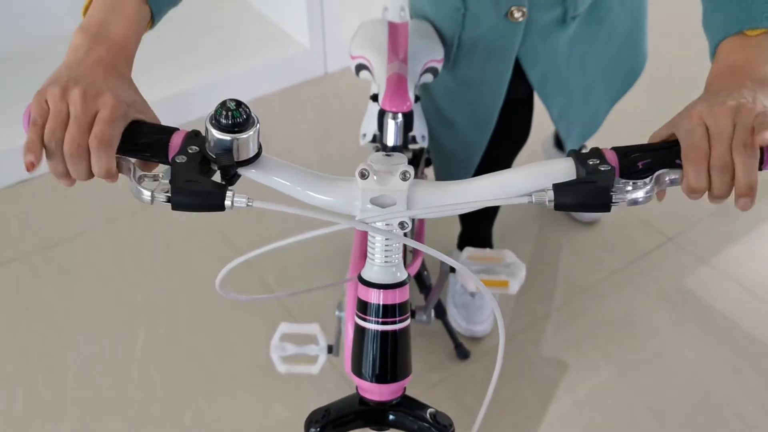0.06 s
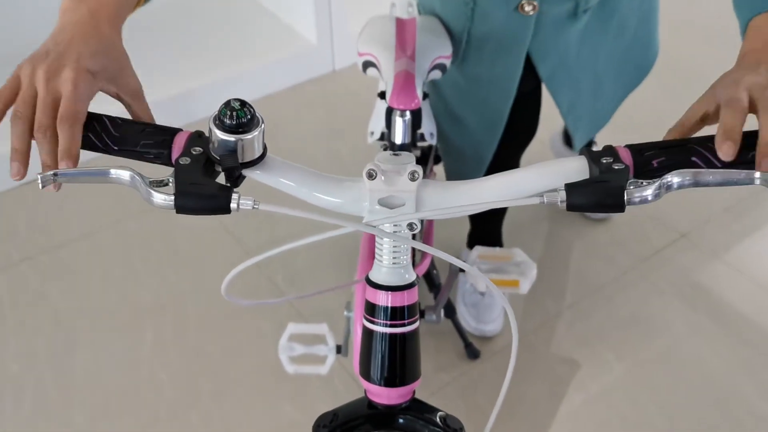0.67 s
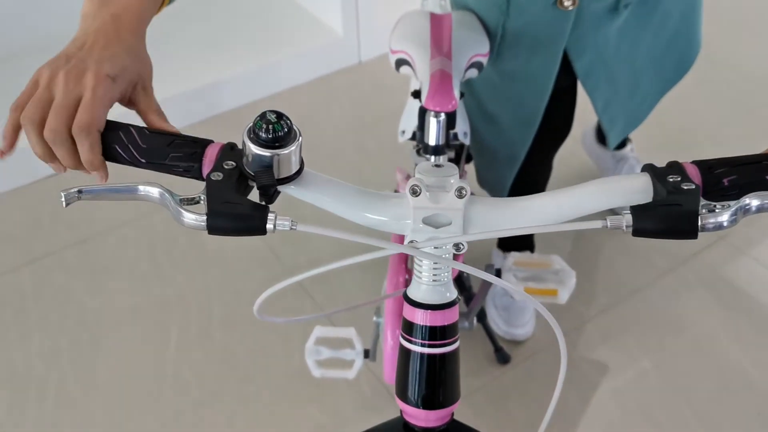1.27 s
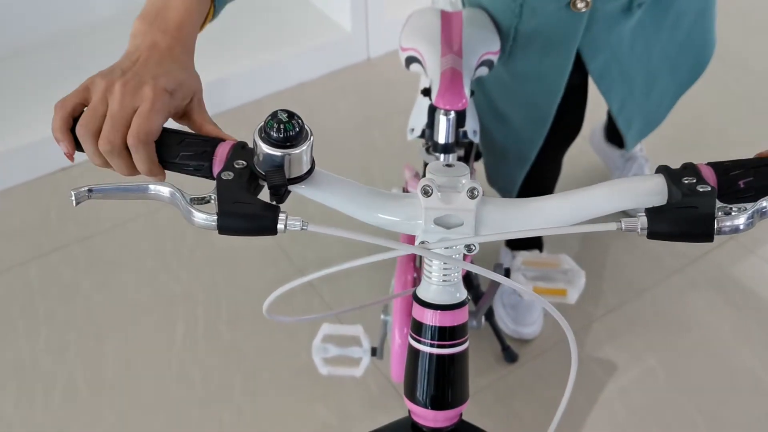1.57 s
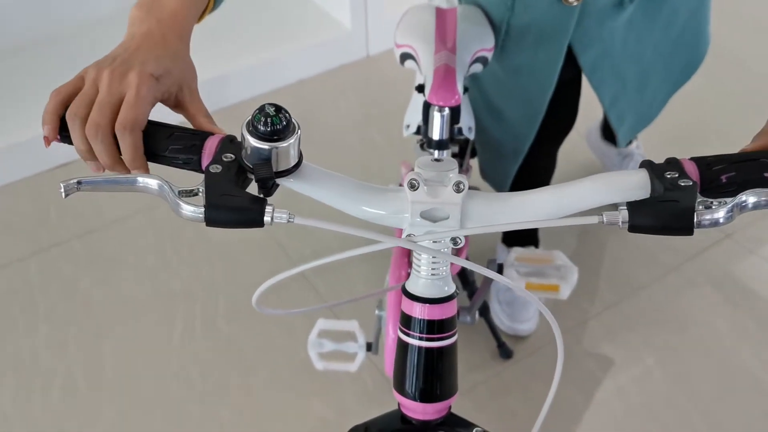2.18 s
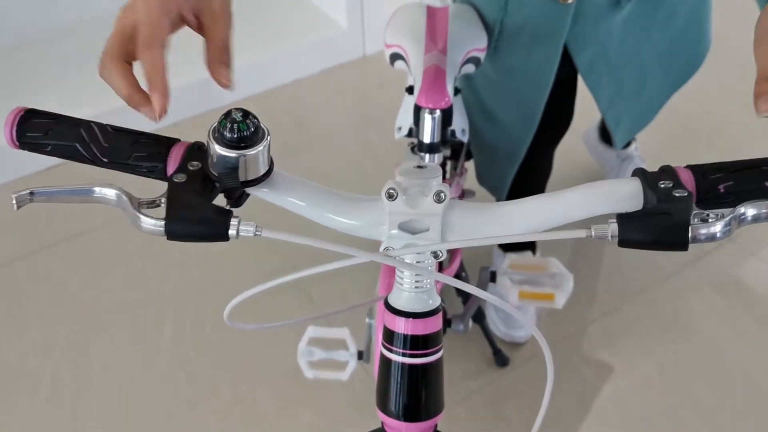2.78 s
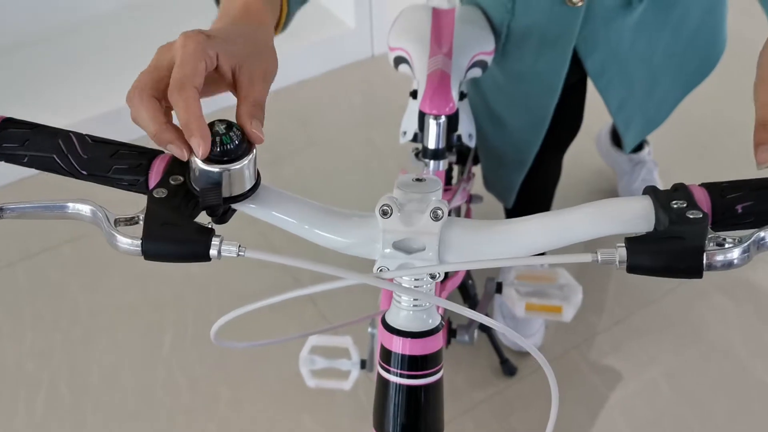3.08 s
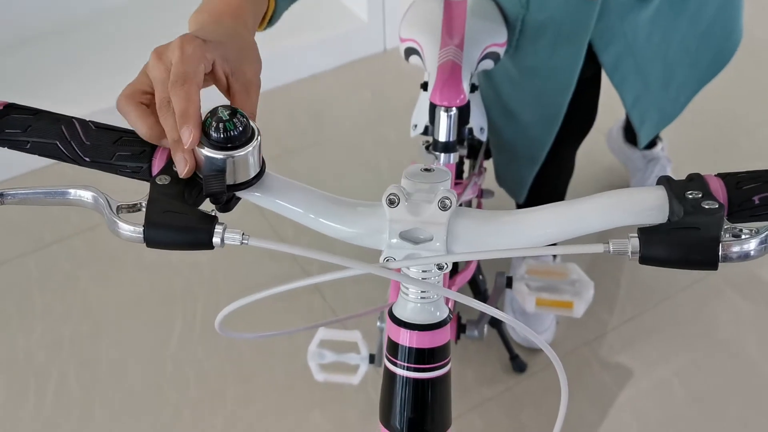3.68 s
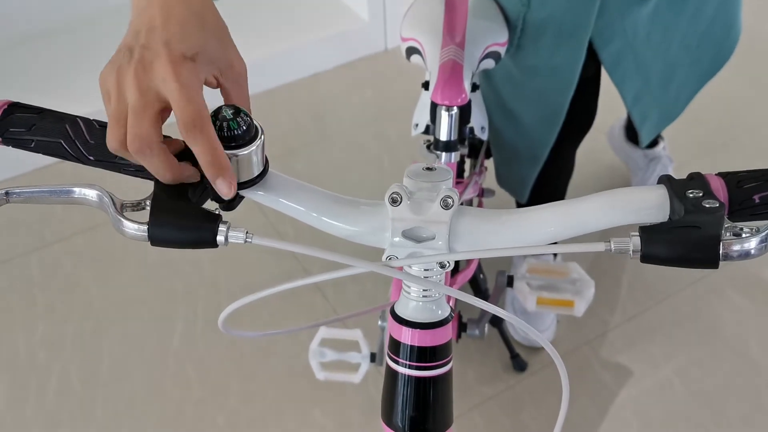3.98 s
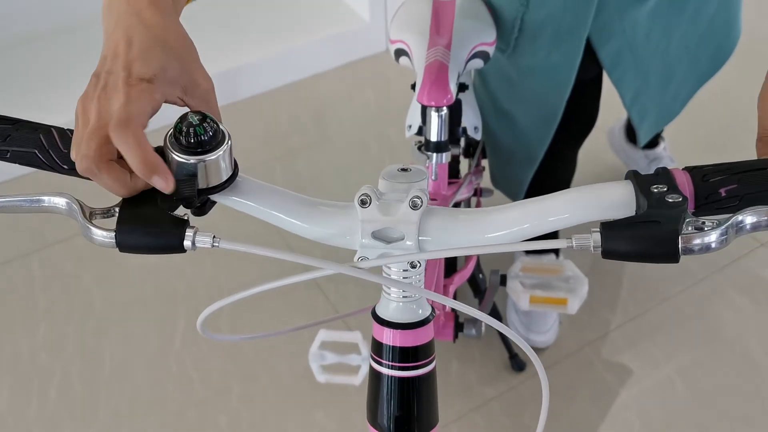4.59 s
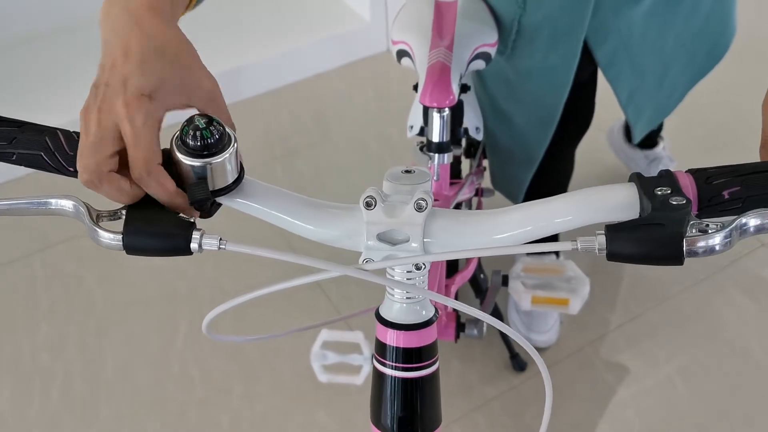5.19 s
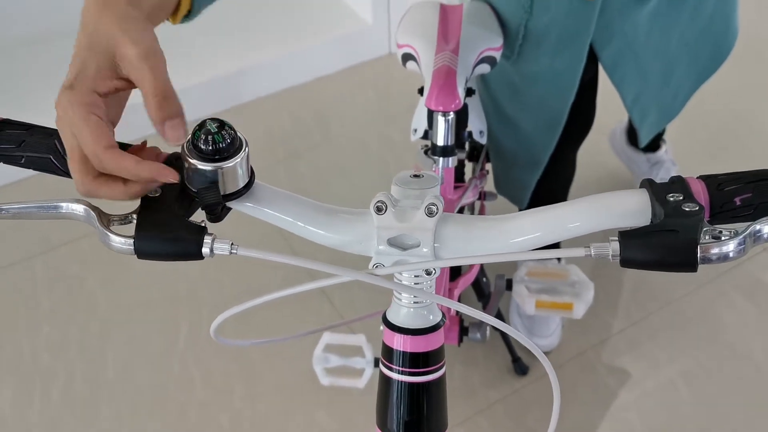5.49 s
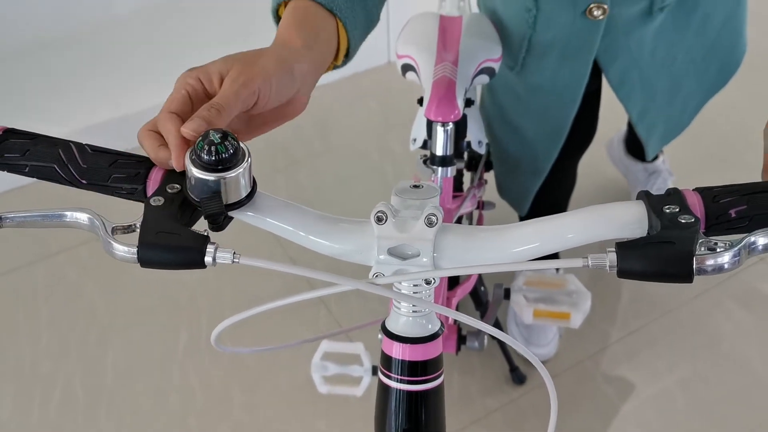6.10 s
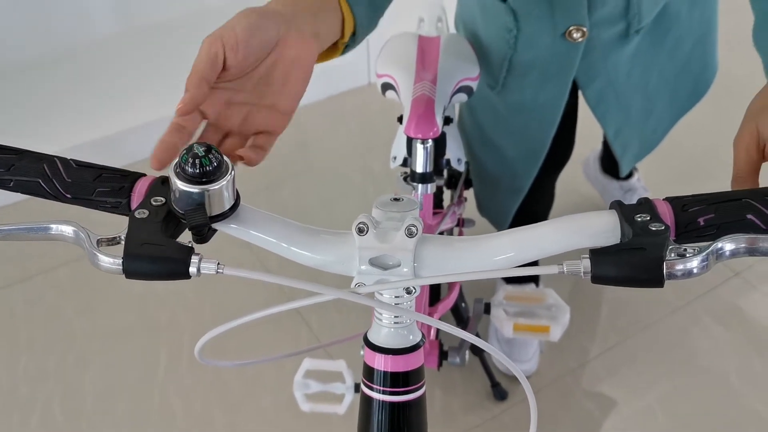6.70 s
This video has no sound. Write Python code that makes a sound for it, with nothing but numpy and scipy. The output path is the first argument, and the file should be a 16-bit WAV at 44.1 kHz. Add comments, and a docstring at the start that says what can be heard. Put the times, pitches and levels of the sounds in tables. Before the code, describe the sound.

In a bare, echoing room, bicycle brake levers tick as they are squeezed, a cable slides, and the levers snap back with two sharp metallic cracks. After a pause, a finger rubs, bumps and creaks close against the microphone on the right. Then a bicycle bell's plastic trigger scrapes and clicks softly, the dome muted by a hand. A few more close creaks follow over faint room hiss.

```python
"""Bicycle brakes and a muted bell

In a bare, echoing room, a bicycle's brake levers are squeezed and snap back, ringing the
handlebar. Then fingers fiddle with the bell: its plastic trigger clicks while the hand mutes
the dome. A finger on the camera bumps, rubs and creaks beside the right microphone."""
import sys
import numpy as np
from scipy import signal
from scipy.io import wavfile
from scipy.ndimage import uniform_filter1d

SR = 44100
rng = np.random.default_rng(int(sys.argv[2]) if len(sys.argv) > 2 else 0)


def materialize(psi):
    """Save the field psi as 16-bit PCM at rate SR to the path in sys.argv[1].

    A 1-D psi becomes a single channel; in a 2-D psi each row is a channel.
    """
    bounded = np.clip(np.atleast_2d(psi).T, -1, 1)
    quanta = np.round(bounded * 32767).astype(np.int16)
    wavfile.write(sys.argv[1], SR, quanta)


N = 301511
TIME = np.arange(N) / SR


def amp(db):
    """Turns decibels into a gain."""
    return 10 ** (np.asarray(db) / 20)


def unit(x):
    """Scales a sound to an average (rms) level of 1."""
    return x / np.sqrt(np.mean(x ** 2) + 1e-20)


def look_up(points, hz):
    """Reads between a table's rows on a log-frequency axis."""
    row_hz, values = np.transpose(points)
    return np.interp(np.log(hz + 1), np.log(row_hz + 1), values)


def add(mix, start, sound):
    """Mixes a sound in at a time in seconds."""
    part = mix[max(round(start * SR), 0):][:len(sound)]
    part += sound[:len(part)]


def colour(x, tone, size=4096):
    """Filters a sound to follow a tone table, with no ringing ahead of it."""
    hz = abs(np.fft.fftfreq(size, 1 / SR))
    log_gain = np.log(amp(look_up(tone, hz)))
    response = np.exp(np.conj(signal.hilbert(log_gain)))
    return signal.oaconvolve(x, np.fft.ifft(response).real)[:len(x)]


def burst(tone, decay_s, size=4096):
    """A brief contact makes a puff of noise that dies quickly."""
    fade = np.exp(-np.arange(size) / SR / decay_s)
    puff = colour(rng.standard_normal(size) * fade, tone)
    return .5 * puff * np.linalg.norm(fade) / np.linalg.norm(puff)


def ring(modes, spread=.015, size=12000):
    """A struck part rings at its own pitches (modes); the hand's grip detunes each blow a little."""
    t = np.arange(size) / SR
    detune = 1 + spread * rng.uniform(-1, 1)
    # neighbouring modes swing in opposite directions
    return sum((-1) ** k * amp(db - 60 * t / ring_s) * np.sin(2 * np.pi * hz * detune * t)
               for k, (hz, db, ring_s) in enumerate(modes))


def effort(strokes, release_s):
    """Each stroke gathers speed, holds, then dies away."""
    gain = np.zeros(N)
    for start, rise_s, hold_s, db in strokes:
        rise = np.clip((TIME - start) / rise_s, 0, 1) ** 2
        fall = np.exp(-np.maximum(TIME - start - rise_s - hold_s, 0) / release_s)
        gain = np.maximum(gain, amp(db) * rise * fall)
    return gain


def friction(strokes, tone, grain_db, release_s):
    """Rubbing is countless tiny, uneven slips; more grain makes it grittier."""
    clumps = unit(uniform_filter1d(rng.standard_normal(N), size=40))
    slips = rng.standard_normal(N) * amp(grain_db * clumps)
    return unit(colour(slips, tone)) * effort(strokes, release_s)


# The quiet room's tone. Each row, as in every tone table: frequency in Hz, level in dB.
AIR_TONE = [(15, -34), (25, 1), (87, -9), (108, -13.5), (134, -12.5), (242, -11), (270, -15.5), (309, -16),
            (427, -23.5), (962, -29.5), (1040, -31.5), (1940, -32.5), (2910, -35.5), (4870, -39.5),
            (8400, -50.5), (11500, -48), (16000, -52)]
def air(shared=0.096):
    """Steady room rumble and hiss, partly common to both microphones."""
    left, right, common = (unit(colour(rng.standard_normal(N), AIR_TONE)) for _ in range(3))
    pair = np.sqrt(1 - shared) * np.array([left, right]) + np.sqrt(shared) * common
    return amp([[-65.2], [-63.7]]) * pair


# How long the room rings. Each row: frequency in Hz, seconds to fade by 60 dB.
ROOM_FADE = [(150, 1.3), (350, 1.8), (1000, 1.43), (3000, 1.46), (4500, 1.1), (8000, 0.54), (15000, 0.2)]
# The tone of that ringing. Each row: frequency in Hz, level in dB.
ROOM_TONE = [(100, 1), (350, 3), (1000, 2.5), (3000, -4.5), (5000, -3.5), (8000, 3.5), (15000, -2.5)]
def reverb(x, build_s=0.01, count=3):
    """The room's long tail, treble dying first. Quick blows radiate differently, so tails take turns."""
    t, out = np.arange(2 * SR) / SR, np.zeros(N)
    for k in range(count):
        hz, frame_s, bands = signal.stft(rng.standard_normal(len(t)), SR, nperseg=256)
        bands *= 1000 ** (-frame_s / look_up(ROOM_FADE, hz)[:, None])
        tail = signal.istft(bands, SR, nperseg=256)[1][:len(t)]
        tail *= 1 - np.exp(-t / build_s)
        share = np.sqrt(2 / count) * np.cos(np.pi * (TIME * 20 + k / count))
        out += signal.fftconvolve(x * share, tail / np.linalg.norm(tail))[:N]
    return colour(out, ROOM_TONE)


# Echoes off floor, bicycle and wall. Each row: delay in seconds before stretching, level in dB.
ECHOES = [(.004, -15), (0.0104, -14), (0.0154, -14), (0.02, -19), (0.023, -21.5)]
def room(x, tail_db, early_db, stretch=1, scatter_s=.018):
    """One microphone hears the direct sound, single echoes, early scatter and the tail."""
    t = np.arange(8192) / SR
    scatter = rng.standard_normal(len(t)) * np.exp(-t / scatter_s)
    response = amp(early_db) * scatter / np.linalg.norm(scatter)
    response[0] += 1  # the direct sound
    for delay, db in ECHOES:
        add(response, delay * stretch, amp([db]))
    return signal.oaconvolve(x, response)[:N] + amp(tail_db) * reverb(x)


# Faint squeaks. Each row: start in seconds, length in seconds, pitch in Hz, level in dB.
SQUEAKS = [(3.137, 0.12, 6860, -72), (5.391, 0.072, 8860, -77), (5.925, 0.033, 9000, -85),
           (6.296, 0.054, 8800, -82), (6.627, 0.12, 8900, -79)]
def squeaks(width_hz=180):
    """Thin, unsteady whistles swell and fade."""
    out = np.zeros(N)
    smoothing = signal.butter(2, width_hz / 2, fs=SR, output="sos")
    for start, length, hz, db in SQUEAKS:
        t = np.arange(round(length * SR)) / SR
        waver = signal.sosfilt(smoothing, rng.standard_normal(SR))[-len(t):]
        whistle = unit(waver * np.sin(2 * np.pi * hz * t))
        add(out, start, amp(db) * whistle * np.hanning(len(t)))
    return out


# Bright ticks. Each row: start in seconds, level in dB.
THIN_TICKS = [(1.099, -49), (1.18, -56), (4.299, -57.5), (6.0842, -42.5)]
# Their tone. Each row: frequency in Hz, level in dB.
TICK_TONE = [(2000, -18), (4800, 2), (5800, 1), (7500, -2), (9000, -12), (11000, -2), (16000, -19)]
def thin_ticks():
    """Tiny dry ticks, like a nail touching the camera case."""
    out = np.zeros(N)
    for start, db in THIN_TICKS:
        add(out, start, amp(db) * burst(TICK_TONE, decay_s=0.0019))
    return out


# The case creaks under the finger. Each row: start in seconds, strength in dB.
CREAKS = [(3.4632, -48.5), (3.489, -48), (3.5095, -48.5), (3.5257, -48.5), (3.577, -45.5), (3.6068, -46),
          (3.638, -46), (3.7107, -47), (3.8, -47.5), (3.8298, -46.5), (3.9455, -44), (6.107, -43.5),
          (6.1408, -42), (6.1664, -41), (6.344, -52.5), (6.5237, -52), (6.8152, -57.5)]
# The tone of the port, the microphone's small opening. Each row: frequency in Hz, level in dB.
PORT_TONE = [(200, -15), (450, -15.5), (1000, -22), (1900, -8.5), (2600, -1), (3200, 5), (3800, -4.5),
             (5000, -20.5), (7300, -21.5), (9000, -34), (11000, -25), (16000, -48)]
def case_creaks(buzz_db=5, slip_s=0.0055, wobble_db=2.5, wobble_hz=100, wobble_s=0.099):
    """Each slip of the case buzzes the hollow of the port and rocks the microphone."""
    out, t = np.zeros(N), np.arange(4096) / SR
    wobble = np.sin(2 * np.pi * wobble_hz * t) * 1000 ** (-t / wobble_s)
    slip = 1 / (1 + (t / slip_s) ** 8)
    for start, db in CREAKS:
        buzz = colour(rng.standard_normal(len(t)) * slip, PORT_TONE)
        buzz *= 0.5 * np.linalg.norm(slip) / np.linalg.norm(buzz)
        add(out, start, amp(db + buzz_db) * buzz + amp(db + wobble_db) * wobble)
    return out


# The finger bumps the port. Each row: time in seconds, level in dB, pulse width in seconds.
BUMPS = [(0.0432, -24.5, .0016), (0.3452, -22.5, .0016), (1.0986, -28.5, 0.0016), (2.8899, -24.5, .0004),
         (2.9573, -34.5, .001), (2.992, -33, 0.0015), (3.0022, -30.5, 0.00029), (3.011, -20.5, 0.00024),
         (3.0957, -14.5, 0.00041), (3.1082, -18, 0.00023), (3.12, -20, 0.00051), (3.125, -22.5, .00025),
         (3.1369, -23, 0.0009), (3.1528, -20.5, 0.00064), (3.1799, -18, 0.00057), (3.1841, -18.5, 0.00032),
         (3.242, -21.5, 0.0003), (3.313, -14.5, .00018), (3.333, -19.5, 0.00025), (6.108, -40.5, 0.00075),
         (6.1415, -41, 0.00082)]
# The hollow tone of a bump's grit. Each row: frequency in Hz, level in dB.
GRIT_TONE = [(100, -9.5), (380, -21.5), (750, -3), (1100, 2), (1900, -10.5), (3000, -5.5), (4500, -11),
             (5600, -17.5), (7800, -19), (9400, -41), (11000, -21.5), (16000, -41)]
def finger_bumps(bass_cut_hz=85, suction=0.13, lead_s=.012):
    """Skin pushes air into the port and pulls away: a two-sided pulse, then grit."""
    out, t = np.zeros(N), np.arange(round(2 * lead_s * SR)) / SR - lead_s
    for time, db, width in BUMPS:
        widths = t / width
        pulse = -3 * (widths + suction) / (1 + widths ** 2) ** 2
        add(out, time - lead_s, amp(db) * pulse * np.hanning(len(t)))
        grit_db = db + 2 - 7 * np.log2(width / 0.00021)  # twice as wide gives 7 dB less grit
        add(out, time, amp(grit_db) * burst(GRIT_TONE, decay_s=0.0015))
    bass_cut = signal.butter(3, bass_cut_hz, "high", fs=SR, output="sos")  # makes pulses swing back
    return signal.sosfilt(bass_cut, out)


# The finger's strokes. Each row: start, rise time and hold time in seconds, level in dB.
BRUSHES = [(2.676, 0.0028, 0.0039, -45.5), (2.67, 0.047, 0.22, -47), (3.02, 0.013, 0.0044, -49),
           (3.09, 0.034, 0.011, -52.5), (3.31, 0.04, 0.16, -72.5)]
GRIP_SHIFTS = [(6.104, 0.0064, 0.083, -59), (6.14, 0.048, 0.037, -52.5)]
DRAGS = [(2.855, 0.033, 0.057, -34), (3.0, 0.018, 0.018, -32.5)]
# The tones of brushing and dragging skin. Each row: frequency in Hz, level in dB.
BRUSH_TONE = [(40, -2), (150, -2.5), (450, -10), (1500, -10), (2300, -3), (3150, 2), (4500, -10.5),
              (6300, -8), (7700, -8), (9300, -18), (11100, -6), (12500, -20), (16000, -38)]
DRAG_TONE = [(30, -16), (90, -0.5), (180, 3), (430, -12), (900, -7.5), (2000, -13), (4000, -16),
             (7800, -18.5), (9300, -36), (11000, -29), (16000, -42.5)]
def finger_rubs():
    """Skin brushes and shifts smoothly on the case, and drags grittily across the port."""
    brush = friction(BRUSHES, BRUSH_TONE, grain_db=1.5, release_s=0.052)
    shift = friction(GRIP_SHIFTS, PORT_TONE, grain_db=1.5, release_s=0.036)
    drag = friction(DRAGS, DRAG_TONE, grain_db=4.0, release_s=0.0062)
    return brush + shift + drag


# The trigger scrapes on its pivot and fingertips rub the dome.
# Each row: start, rise time and hold time in seconds, level in dB.
SCRAPES = [(4.405, 0.013, .004, -49), (4.42, .015, .06, -63.5), (4.72, 0.042, .09, -74),
           (4.98, 0.032, .01, -62.5), (5.026, 0.0042, .019, -43.5)]
DOME_RUBS = [(3.41, 0.028, 0.024, -67), (3.76, 0.022, .01, -70), (4.0, 0.058, .05, -74),
             (4.42, 0.012, 0.021, -71), (5.39, 0.026, 0.016, -78.5)]
# The trigger's clicks. Each row: start in seconds, level in dB.
TRIGGER_CLICKS = [(4.4226, -47.5), (4.437, -49), (4.799, -55.5), (4.8438, -51.5), (5.033, -40),
                  (5.039, -32), (5.052, -33), (5.4326, -56)]
# The tones of scraping and clicking plastic. Each row: frequency in Hz, level in dB.
SCRAPE_TONE = [(200, -28), (340, -11.5), (480, -22), (660, -2), (900, -9.5), (1450, -12), (2200, 4.5),
               (3800, -3.5), (4900, 6), (6000, -3), (7600, -3.5), (9200, -26), (11000, -14.5), (16000, -29)]
CLICK_TONE = [(300, -17), (1400, -17), (2100, 4), (5000, 3.5), (7400, 0), (9000, -18), (11000, -7),
              (16000, -34)]
# The muted bell and its mount. Each row: pitch in Hz, level in dB, seconds to fade by 60 dB.
BELL_MODES = [(340, -26.5, 0.1), (655, -24.5, 0.05), (1970, -18.5, 0.033), (2313, -11.5, 0.039),
              (3064, -4, 0.0095), (4920, -3.5, 0.014), (6940, -4.5, 0.0092)]
def bell():
    """The trigger scrapes and ticks against the dome; fingers mute it, and their rubbing stirs it."""
    out = friction(SCRAPES, SCRAPE_TONE, grain_db=4.0, release_s=0.003)
    for start, db in TRIGGER_CLICKS:
        add(out, start, amp(db) * burst(CLICK_TONE, decay_s=0.0018))
        add(out, start, amp(db) * ring(BELL_MODES))
    rubbed = unit(signal.oaconvolve(rng.standard_normal(N), ring(BELL_MODES))[:N])
    return out + rubbed * effort(DOME_RUBS, release_s=0.089)


# The tone of brake parts hitting each other. Each row: frequency in Hz, level in dB.
CRACK_TONE = [(200, -17.5), (900, -10.5), (1900, -5), (3800, 5.5), (5500, -1.5), (8000, -5.5), (10500, -3),
              (13000, -9), (16000, -10)]
def crack(top_hz):
    """A hard contact, dulled above top_hz."""
    treble_cut = signal.butter(2, top_hz, fs=SR, output="sos")
    return signal.sosfilt(treble_cut, burst(CRACK_TONE, decay_s=0.0023))


# The cable slides in its sleeve. Each row: start, rise time and hold time in seconds, level in dB.
CABLE_SLIDES = [(0, 0.0027, .015, -63), (.07, 0.086, .05, -56), (.48, .075, .006, -46)]
# Its tone. Each row: frequency in Hz, level in dB.
CABLE_TONE = [(180, -34.5), (300, -9), (392, -6), (478, -10.5), (565, -13), (1040, -10), (1430, -12),
              (2440, -12), (3130, 0), (4090, -9.5), (8500, -27), (10600, -26), (16000, -31)]
# The linkage takes up its slack. Each row: start in seconds, level in dB, treble limit in Hz.
LEVER_TICKS = [(0.0585, -25, 4540), (0.0914, -25.5, 2790), (.244, -22.5, 15100), (0.2547, -39.5, 13900),
               (0.5525, -35, 15000), (0.562, -35, 11950)]
# A lever snaps back. Each row: start in seconds, ring and crack levels in dB, seconds to next contact.
LEVER_SNAPS = [(0.5807, -6, -18, .0037), (0.6074, -5, -13.5, .0016)]
# The lever and handlebar ring. Each row: pitch in Hz, level in dB, seconds to fade by 60 dB.
LEVER_MODES = [(338.4, -45.5, .2), (625, -40.5, .05), (1069, -27.5, 0.025), (1220, -31.5, .02),
               (2350, -14.5, .012), (2716, -8.5, 0.011), (2956, -1.5, 0.0088), (3190, -2, 0.011),
               (3460, -10, .013), (3890, -18, 0.009), (7230, -18.5, 0.0045)]
def brakes(chatter_db=-5.5, rebound_s=.012, rebound_db=-12.5):
    """The cable slides and the linkage ticks; let go, each lever hits its stop, chatters and rebounds."""
    out = friction(CABLE_SLIDES, CABLE_TONE, grain_db=0.0, release_s=0.039)
    for start, db, top_hz in LEVER_TICKS:
        add(out, start, amp(db) * crack(top_hz))
    for start, ring_db, crack_db, chatter_s in LEVER_SNAPS:
        for delay, db in [(0, 0), (chatter_s, chatter_db), (rebound_s, rebound_db)]:
            add(out, start + delay, amp(db + ring_db) * ring(LEVER_MODES, spread=0.046))
            add(out, start + delay, amp(db + crack_db) * crack(top_hz=13000))
    return out


# How the left microphone is shaded. Each row: frequency in Hz, level change in dB.
LEFT_SHADE = [(300, -7), (900, -4.5), (3000, -10.5), (5000, -7.5), (7200, -22), (10000, -3.5),
              (16000, -2.5)]
def scene():
    """The bicycle reaches the left side first, but shaded; the finger is almost only on the right."""
    bicycle = brakes() + bell()
    left = colour(room(bicycle, tail_db=-4.0, early_db=-1, stretch=1.17), LEFT_SHADE)
    right = room(np.roll(bicycle, 6), tail_db=-8.0, early_db=-7.5)  # 6 samples later
    finger = finger_rubs() + finger_bumps() + case_creaks() + thin_ticks()
    return np.array([left, right]) + finger * amp([[-36], [0]]) + squeaks() * amp([[-5], [0]]) + air()


def record(dry):
    """Cuts the highest treble, above 16300 Hz."""
    treble_cut = signal.firwin(401, 16300, window=("kaiser", 8), fs=SR)
    return signal.oaconvolve(dry, treble_cut[None], "same")


dry = scene()
out = record(dry)
materialize(out)
```